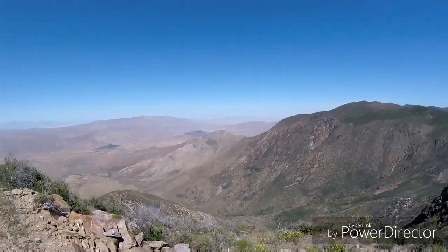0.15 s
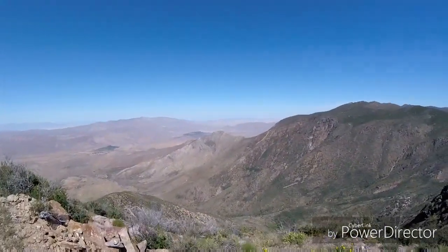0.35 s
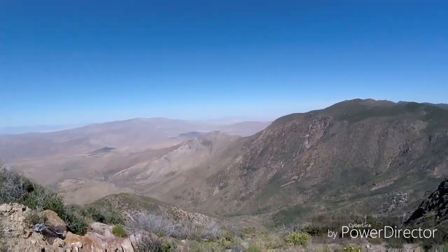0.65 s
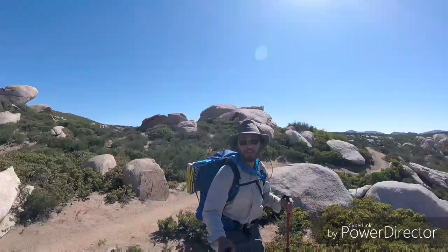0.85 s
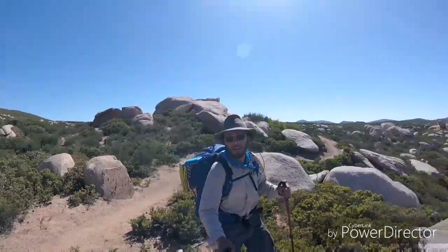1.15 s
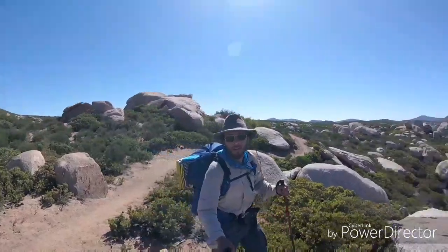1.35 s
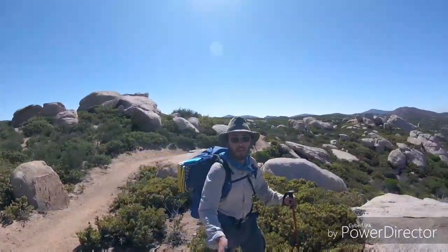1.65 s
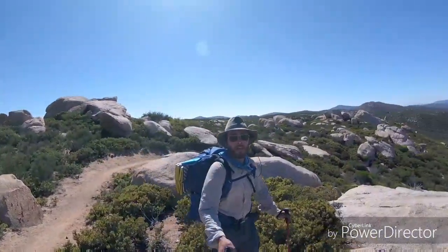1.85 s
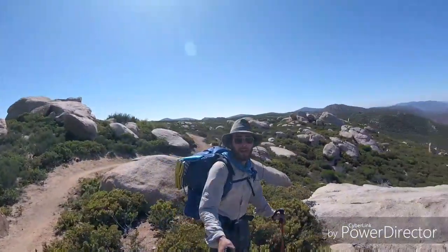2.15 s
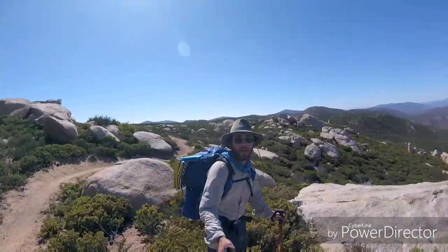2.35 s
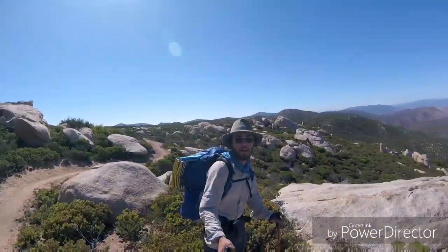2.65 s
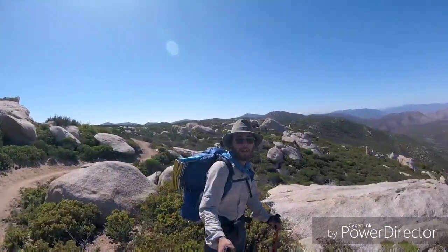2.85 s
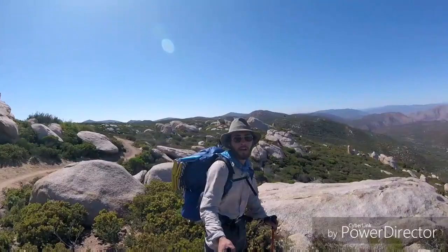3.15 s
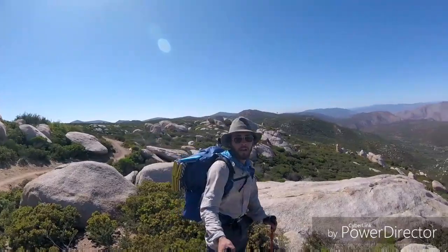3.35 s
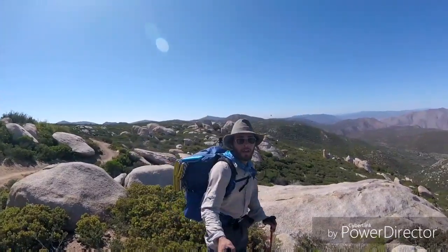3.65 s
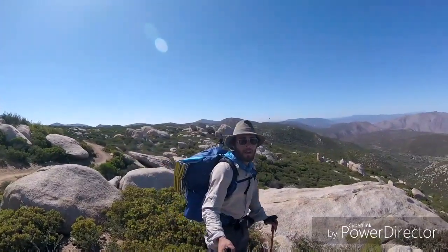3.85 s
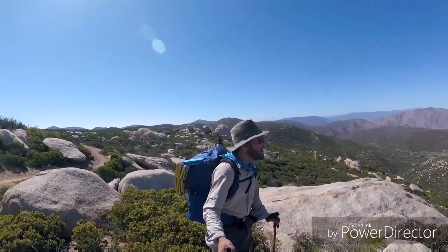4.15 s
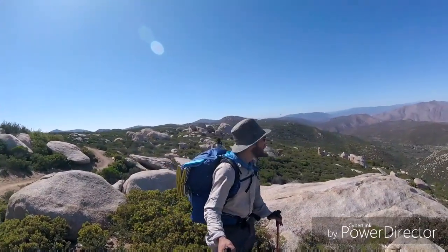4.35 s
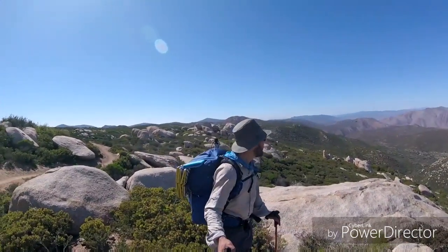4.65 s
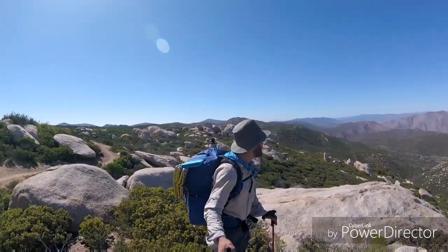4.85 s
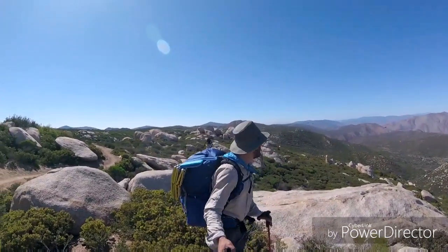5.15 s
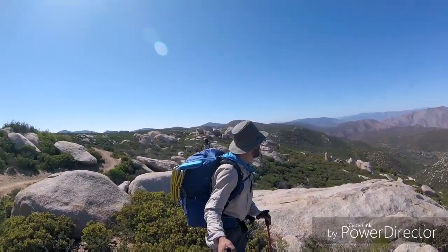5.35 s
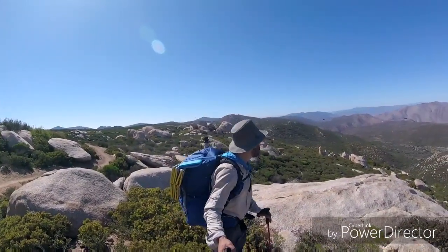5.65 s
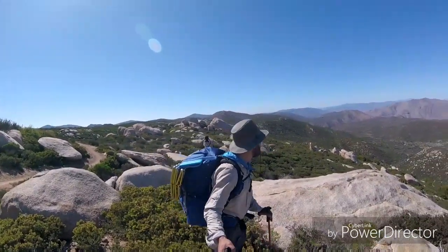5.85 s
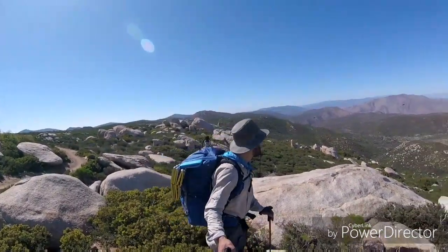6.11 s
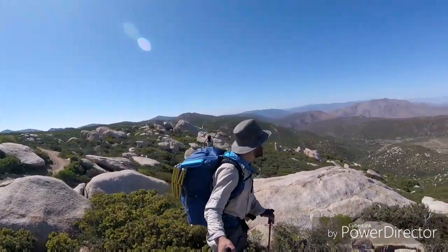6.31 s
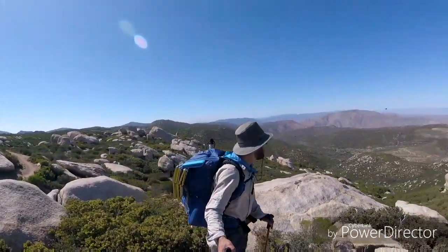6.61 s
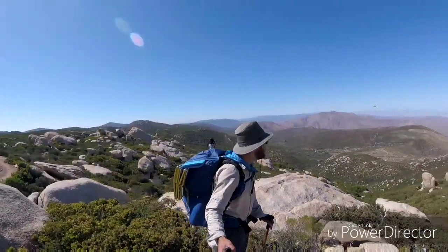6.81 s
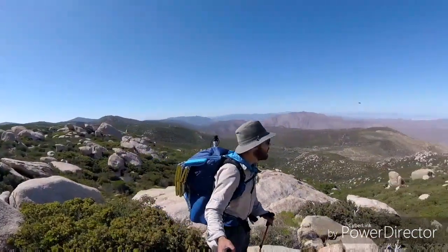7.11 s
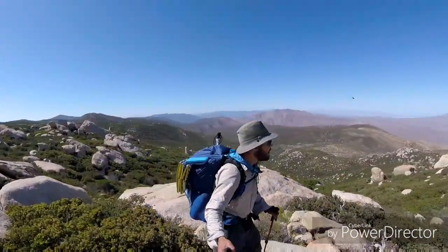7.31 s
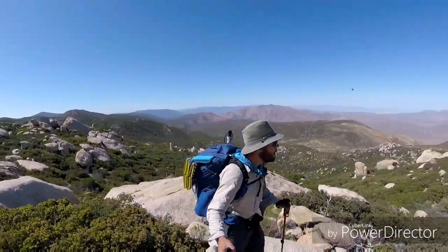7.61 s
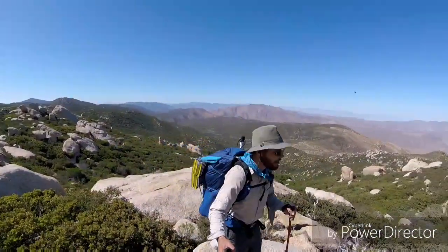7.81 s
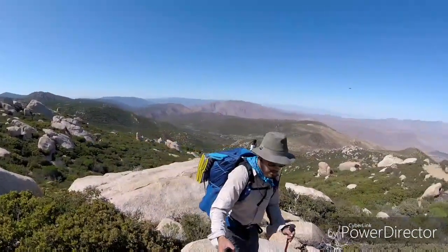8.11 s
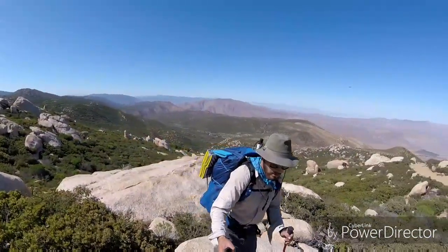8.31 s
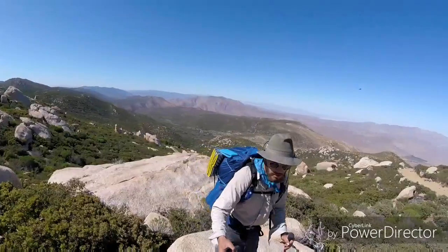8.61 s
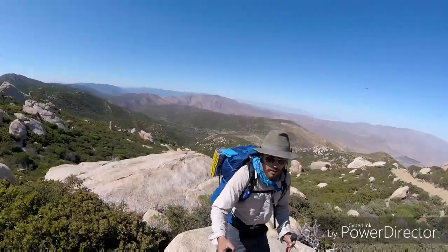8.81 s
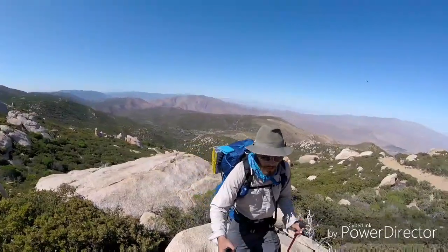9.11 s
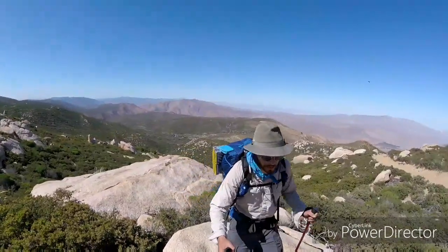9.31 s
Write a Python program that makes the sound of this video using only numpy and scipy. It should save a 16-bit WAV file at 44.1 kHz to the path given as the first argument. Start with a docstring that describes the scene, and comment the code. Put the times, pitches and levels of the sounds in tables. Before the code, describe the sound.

Heavy wind rumbling and tearing across an exposed microphone on a rocky ridge, with occasional dull boot scuffs and clicks of a pole tip.

```python
"""Rocky ridge, gusty wind: a hiker turns with a small camera at arm's length.
Eddies buffet the microphone port: half-octave noise and shared pops rumble, and rasp as gusts tear.
Slaps and a late soft scuff swell in the same bands; thumps are pressure lobes, ticks decaying steps.
A pole tip and boots tap and crunch on gritty rock: scratchy noise through rock resonances.
Faint coloured noise hisses behind, higher before 0.92 s, then lower on a set level curve."""
import sys
import numpy as np
from scipy import signal
from scipy.fft import rfft, irfft
from scipy.io import wavfile
from scipy.ndimage import uniform_filter1d

SR = 44100
rng = np.random.default_rng(int(sys.argv[2]) if len(sys.argv) > 2 else 0)


def magnitude_from_level(level_db):
    """Linear magnitude for a level in decibels (20 dB per decade)."""
    exponent = np.asarray(level_db, float) / 20
    return 10 ** exponent


def materialize(psi):
    """Save the field psi as 16-bit PCM at rate SR to the path in sys.argv[1].

    A 1-D psi becomes a single channel; in a 2-D psi each row is a channel.
    """
    bounded = np.clip(np.atleast_2d(psi).T, -1, 1)
    quanta = np.round(bounded * 32767).astype(np.int16)
    wavfile.write(sys.argv[1], SR, quanta)


N = 417627

# slow wind on the port; tearing = how close the small eddies come to the force:
# (time [s], force [dB], tearing [dB])
WIND = [(0.0, -7.5, -25), (0.3, -21, -24), (0.905, -24, -42), (0.945, -14.5, -18.5), (1.12, -24.5, -14.5),
        (1.28, -28.5, -17), (1.45, -34, -25.5), (1.77, -22.5, -34), (1.9, -23, -21.5), (2.32, -30, -23.5),
        (2.89, -42.5, -14.5), (2.93, -41.5, -2), (3.17, -32, 2.5), (3.33, -23, -2.5), (3.5, -18, -6),
        (3.74, -11, -10), (3.77, -22.5, 4), (4.06, -23, -11.5), (4.1, -21, -10.5), (4.27, -25, -21),
        (4.53, -13.5, -14), (4.85, -24, -7.5), (5.43, -19, -8.5), (5.54, -30.5, -26), (5.65, -16.5, -10),
        (5.69, -15.5, -5.5), (5.93, -25, -2.5), (6.2, -20.5, -15.5), (6.5, -20, -25), (6.88, -34, -30),
        (6.96, -30.5, -38), (8.17, -25, -42.5), (8.28, -17, -20), (8.5, -30, -51), (8.72, -39, -43.5),
        (8.9, -22, -29.5), (9.25, -30, -36.5), (9.47, -17, -18)]
# brief puffs (+) and lulls (-) laid on the slow wind:
# (peak time [s], length [s], force change [dB], tearing change [dB])
PUFFS = [(0.07, 0.085, -10, -21), (0.168, 0.09, -11, -11), (0.227, 0.0094, 3, 10), (0.733, 0.029, 12.5, -2),
         (1.08, 0.093, 8, -2.5), (1.705, 0.069, -0.5, 9.5), (1.883, 0.025, -9, 19), (1.997, 0.02, -10, -6),
         (2.091, 0.069, 8.5, 1), (2.2, 0.048, 10.5, 3.5), (2.963, 0.098, 5, 7.5), (3.031, 0.055, 6, 14.5),
         (3.138, 0.049, 3, -26), (3.233, 0.2, -1, 9), (3.375, 0.021, 3, 7), (3.434, 0.019, 9, 2.5),
         (3.465, 0.048, 3.5, -14.5), (3.595, 0.042, -5, 3), (3.622, 0.042, -2.5, 9.5),
         (3.801, 0.026, 5.5, -8.5), (3.857, 0.039, 0.5, -3), (4.029, 0.083, 0.5, 10.5),
         (4.189, 0.022, -12, 1.5), (4.276, 0.03, 9.5, 4), (4.567, 0.038, -2.5, 8),
         (4.648, 0.011, -6, -20.5), (4.785, 0.1, 7.5, -5.5), (4.434, 0.032, -8.5, 13.5),
         (4.929, 0.025, -1.5, 8), (4.993, 0.076, -7, -3.5), (5.083, 0.13, 9, -0.5), (5.185, 0.039, -7, -5),
         (5.219, 0.033, 8.5, -3), (5.291, 0.028, 1.5, 10), (5.729, 0.056, 3.5, 12),
         (5.785, 0.049, 3.5, -2.5), (5.909, 0.054, 3, 7.5), (6.025, 0.036, 5, 10.5),
         (5.855, 0.041, 3, 10.5), (5.866, 0.012, 1, -6), (6.099, 0.063, 4.5, 3), (6.138, 0.046, -4.5, 11),
         (6.423, 0.093, 2, 17), (6.595, 0.055, 7, 5.5), (6.765, 0.1, 8.5, -3), (6.879, 0.13, 10, 11),
         (7.258, 0.033, 10, 4), (7.724, 0.047, 9.5, 11), (7.436, 0.16, 7, -0.5), (7.816, 0.15, -7, -11),
         (8.022, 0.26, 5.5, -1.5), (8.305, 0.033, 2.5, 7.5), (8.439, 0.11, 6.5, 18), (8.572, 0.023, 9, 14),
         (8.632, 0.06, 6.5, 23.5), (8.811, 0.027, 14.5, 16), (8.949, 0.052, 4, -8.5),
         (9.029, 0.0082, 18, 16.5), (9.078, 0.09, -5.5, 1), (9.137, 0.028, -4, 16),
         (9.273, 0.031, 11.5, 11.5), (9.37, 0.12, 2.5, 7.5)]
# how squarely the port faces the wind as the arm turns: (time [s], lift of the smallest eddies [dB])
BITE = [(0, 32), (.9, 2), (.95, 18), (1.05, 14), (1.35, 11), (1.8, 11), (3.1, -17), (3.5, 3), (4.1, 6),
        (4.25, 4.5), (5.5, -12.5), (5.8, -4.5), (5.95, 2), (6.08, -3.5), (6.4, -15), (9.47, -10.5)]
# eddy sizes: (centre [Hz])
EDDY_HZ = [40, 100, 200, 630, 1100, 1900]
# a half octave's share of the force, per eddy size: (level [dB])
EDDY_SHARE_DB = [-8, -8.5, -7, -8, -19.5, -31]
# burstiness per eddy size: (scale of the level swings [dB])
EDDY_BURST_DB = [1.299, 2.1, 3.0, 3.501, 3.6, 4.5]
# gain with tearing, per eddy size: (slope [dB per dB])
EDDY_TEAR_DB_PER_DB = [-0.034, -0.022, 0.18, 0.96, 1.26, 1.61]
# short low bursts: wind slaps on the port, and a soft scuff from 9.24 to 9.39 s:
# (time [s], peak [dB], treble over peak [dB])
SLAPS_AND_SCUFF = [(.035, -23, -62), (0.074, -18.5, -70), (.196, -23, -46), (.241, -26, -56),
                   (0.296, -23, -53), (0.362, -24, -43), (0.677, -23.5, -68), (.935, -24, -28),
                   (1.04, -24, -14), (1.055, -27, -21), (1.09, -26, -46), (1.849, -14, -30),
                   (1.861, -9.5, -28), (1.87, -10.5, -33), (1.904, -9.5, -66), (1.935, -14.5, -55),
                   (1.968, -18, -58), (2.036, -16, -44), (2.066, -19, -21), (2.076, -13.5, -34),
                   (2.187, -27, -35), (2.96, -25, -47), (2.99, -25, -45), (3.012, -13.5, -37),
                   (3.021, -10, -39), (3.043, -17.5, -32), (3.165, -25, -48), (3.186, -9.5, -46),
                   (3.198, -8, -34), (3.251, -24, -23), (3.274, -16, -29), (3.289, -26, -29),
                   (3.346, -6.5, -42), (3.366, -17, -39), (3.378, -6, -27), (3.417, -6, -42),
                   (3.44, -11, -36), (3.474, -15.5, -30.5), (3.513, -9.5, -35.5), (3.543, -15, -30),
                   (3.592, -10, -27.5), (3.614, -12.5, -24), (3.635, -19, -30), (3.645, -20, -24),
                   (3.675, -12, -32), (3.689, -12.5, -27), (3.737, -9, -26), (3.759, -15, -16),
                   (3.771, -8.5, -17.5), (3.8, -18.5, -12.5), (3.808, -15, -18), (3.824, -16.5, -21),
                   (3.898, -13.5, -37), (3.919, -21.5, -20), (3.937, -21, -19.5), (3.95, -20, -19),
                   (3.974, -26, -14), (3.99, -27, -12), (4.003, -24.5, -10.5), (4.03, -17, -18.5),
                   (4.042, -25, -19), (4.057, -18.5, -21), (4.096, -28, -33), (4.132, -17, -30),
                   (4.225, -17, -71), (4.447, -20.5, -27), (4.51, -15, -47), (4.566, -11.5, -42),
                   (4.701, -12, -46), (4.752, -11, -30), (4.783, -3, -40), (4.802, -15.5, -26),
                   (5.018, -19, -32), (5.042, -15, -33), (5.067, -26, -31), (5.208, -17, -28),
                   (5.12, -14.5, -29), (5.084, -21, -23), (5.147, -22, -25), (5.285, -9.5, -45),
                   (5.369, -16, -46), (5.402, -22.5, -26.5), (5.676, -8.5, -50), (5.705, -11, -27),
                   (5.723, -10, -20), (5.736, -16, -19), (5.808, -8.5, -25.5), (5.835, -5, -24),
                   (5.854, -13, -17), (5.903, -7, -24.5), (5.916, -0.5, -29.5), (5.893, -15, -26),
                   (5.95, -12, -42), (5.968, -8, -37), (6.011, -17, -34), (6.034, -17.5, -26.5),
                   (6.097, -17, -51), (6.16, -10.5, -62), (6.211, -13, -53), (6.238, -9.5, -62),
                   (6.271, -23.5, -32), (6.316, -22, -55), (6.351, -31, -51), (6.396, -26.5, -45),
                   (6.411, -26, -48), (6.433, -16, -53), (8.31, -9.5, -65), (8.801, -33, -59),
                   (8.838, -30, -64), (9.026, -19.5, -65), (9.158, -18.5, -60), (9.243, -36.5, -50),
                   (9.267, -42, -50), (9.282, -30, -45), (9.32, -36, -50), (9.342, -26, -61),
                   (9.386, -24, -56), (9.447, -12.5, -61)]
# single eddies that push (+) or suck (-) the diaphragm once:
# (time [s], lobe pressure [full scale], half-height width of the lobe [s])
THUMPS = [(0.24, -0.34, 0.0071), (0.301, 0.93, 0.0025), (0.361, 0.96, 0.0022), (0.4889, -0.75, 0.0048),
          (0.6126, -0.39, 0.0066), (0.726, -0.62, 0.0033), (0.9502, -1.3, 0.0016), (2.0805, 0.47, 0.0015),
          (3.5769, -0.53, 0.0016), (4.304, 0.49, 0.0015), (4.588, -0.67, 0.00091), (4.927, -0.51, 0.0059),
          (5.088, -0.19, 0.0017), (5.149, -0.85, 0.0011), (5.403, -0.6, 0.00081), (5.6766, -1.26, 0.00092),
          (6.0998, -0.07, 0.00077), (6.2734, -0.73, 0.0013), (6.8847, 0.48, 0.0038), (8.3129, 0.74, 0.0022),
          (8.813, -0.3, 0.0081), (9.1637, 0.46, 0.005), (9.413, 0.82, 0.0028)]
# sharp ticks: (time [s], treble peak [dB], low-pass corner [Hz])
TICKS = [(0.921, -29.5, 11700), (.946, -48, 7000), (1.069, -42, 8000), (1.131, -45, 8060),
         (2.0915, -51, 8000), (3.5329, -32, 8060), (4.526, -36, 7460), (4.556, -44.5, 7000),
         (4.717, -32.5, 7750), (5.3567, -39, 7560), (5.676, -33, 8200), (5.7335, -39.5, 8030),
         (8.269, -24.5, 7960)]
# pole tip and boot on rock:
# (time [s], push [dB], contact [s], grit over push [dB], brightness [dB per octave])
TAPS = [(.222, -26, 0.00088, -13.5, 5), (0.237, -58, 0.037, -18, 6), (0.353, -48.5, 0.016, -8, -3.5),
        (0.383, -53.5, 0.061, -13, -2.5), (0.435, -49, 0.043, -8, 0), (2.018, -32.5, 0.0035, -2, -1),
        (2.145, -37, 0.00084, -28, 0.5), (2.48, -47, 0.0013, -20, -2), (4.7544, -33, 0.0011, -21, -11),
        (4.784, -30.5, 0.00097, -26, -14), (4.802, -34, 0.00079, -23, -17),
        (5.211, -35.5, 0.0011, -14.5, -22), (7.28, -51, 0.0096, 15, 2), (7.292, -49, 0.0093, -11, -1),
        (7.436, -50, 0.0017, -20, 0), (7.607, -38, 0.0059, -8, 2.5), (8.151, -47, 0.002, -16, -3),
        (8.174, -48, 0.0024, -34, -3), (8.205, -47, 0.0016, -7, -2), (8.236, -21.5, 0.0057, -7, -4.5),
        (8.348, -59, 0.018, 2, -1), (8.9606, -26.5, 0.002, -24, -1), (8.9667, -46, 0.001, -18, 8)]
# resonances of tip and rock: (centre [Hz], width [Hz], gain [dB])
ROCK = [(1166, 300, 1), (1660, 350, 5.5), (2440, 440, 2.5), (3340, 720, -3.5), (4210, 280, -0.5),
        (4920, 900, -2.5), (7160, 1800, -34)]
# background hiss in the 6-9 kHz band, stepping down near 0.92 s: (time [s], level [dB])
HISS = [(0, -70.5), (.5, -72), (.915, -70.5), (.93, -78.5), (1.4, -80.5), (1.9, -75.5), (2.6, -74),
        (3.3, -73.5), (3.6, -76.5), (4.3, -77), (5.5, -78), (6.2, -77), (7, -75.5), (8.1, -72.5),
        (8.4, -77), (9.47, -73.5)]
# hiss spectrum: (frequency [Hz], relative density [dB])
HISS_COLOUR = [(300, 10.5), (800, 20), (1600, 17.5), (3000, 12.5), (4200, 4), (5500, 8.5), (7000, 10),
               (9000, 5), (12000, -5), (15000, -35.5)]

PUFF_RISE_SHARE = 0.61  # of a puff's length
RASP_FALL_DB_PER_OCT = -16  # above the smallest eddies
BAND_FLICKER_DB = 1.3  # each half octave's own wavering
POPS_PER_S, POP_SCATTER_DB = 400, 3.2
POP_SHARE, POP_FULL_HZ = 0.75, 400  # pops' share of the power, at its most from this band up
POP_FADE_DB = 24  # pops die out as tearing falls this far below 0 dB
BURST_HZ, BURST_TREBLE_HZ, BURST_UNIT_S = 870, 3000, 0.004
BURST_CREST_UNITS = 0.75  # crest delay in BURST_UNIT_S
BURST_SHARE_DB = -17  # a half octave's share of a burst's peak, at BURST_HZ
BURST_POP_DB = 7  # a burst's own pop over the smallest chance pop
BURST_BASS_DB_PER_OCT, BURST_DULL_BASS = 2.5, 0.12  # slope below BURST_HZ; its loss per dB of dullness
STRAYS, STRAY_SCATTER_DB = 70, 2
STRAY_TREBLE_DB, STRAY_TREBLE_SPREAD_DB = -31, 8  # at 0 dB tearing; spread is +/-
STRAY_TEAR_DB_PER_DB = 0.52  # treble gained with tearing
THUMP_REBOUND = 2.8  # width of the opposite swing over that of the lobe
TICK_STEP_DB = 8.5  # step height over treble peak
GRIT_T60_S = 0.08
ROCK_SCATTER = 0.04  # +/- share of each ring pitch, drawn per contact


def curve(table):
    """Columns of a table joined by straight lines, one value a sample."""
    s, *columns = np.transpose(table)
    return np.array([np.interp(np.arange(N) / SR, s, c) for c in columns])


def lowpass(x, hz, order):
    """Butterworth low-pass."""
    return signal.sosfilt(signal.butter(order, hz, fs=SR, output="sos"), x)


def band(x, hz, width_hz, order=3):
    """Band-pass of a given width, centred geometrically near hz."""
    middle = np.sqrt(hz ** 2 + width_hz ** 2 / 4)
    edges = [middle - width_hz / 2, middle + width_hz / 2]
    return signal.sosfilt(signal.butter(order, edges, "bandpass", fs=SR, output="sos"), x)


def walk(rate_hz):
    """Random levels held 1 / rate_hz and slewed twice; spread near 1."""
    k = int(SR / rate_hz)
    held = np.repeat(rng.standard_normal(N // k + 1), k)
    return 1.3 * uniform_filter1d(uniform_filter1d(held, k), k)[:N]


def spikes(s, size):
    """Impulses of the given sizes at the given times."""
    return np.bincount(np.round(s * SR).astype(int), size, N)[:N]


def flow():
    """Force and tearing of the wind: the slow curve with every puff and lull laid on it."""
    t, out = np.arange(N) / SR, curve(WIND)
    for s, length_s, force_db, tear_db in PUFFS:
        near = slice(max(int((s - 0.4) * SR), 0), int((s + 0.4) * SR))
        share = np.where(t[near] < s, PUFF_RISE_SHARE, 1 - PUFF_RISE_SHARE)
        side_s = share * max(length_s, 0.01)
        out[:, near] += np.outer([force_db, tear_db], np.exp(-((t[near] - s) / side_s) ** 2))
    return out


def strays(force_db, tear_db):
    """Further slaps at random times, scaled to the small eddies, brighter as the flow tears."""
    chance = rng.random((STRAYS, 3))
    at = (chance[:, 0] * (N - 1)).astype(int)
    peak_db = force_db[at] + tear_db[at] - STRAY_SCATTER_DB * np.log(1 - chance[:, 1])
    treble_db = STRAY_TREBLE_DB + STRAY_TEAR_DB_PER_DB * tear_db[at]
    treble_db = treble_db + STRAY_TREBLE_SPREAD_DB * (2 * chance[:, 2] - 1)
    return np.c_[at / SR, peak_db, treble_db]


def eddy_pops(burst_s):
    """Tiny eddies burst as sharp pops at random; every listed or stray burst adds one at its crest."""
    size = magnitude_from_level(POP_SCATTER_DB * rng.exponential(size=N))
    pops = (rng.random(N) < POPS_PER_S / SR) * size * rng.choice([-1, -1, 1], N)
    crest_s = burst_s + BURST_CREST_UNITS * BURST_UNIT_S
    return pops - spikes(crest_s, np.full(len(burst_s), magnitude_from_level(BURST_POP_DB)))


def eddies(hz, pops, tear_db):
    """A half octave of fresh noise plus pops, each scaled to rms 1 before mixing by power share."""
    smooth = band(rng.standard_normal(N), hz, hz / 3)
    # forward and backward: pops stay in step across bands, hence sharp
    sharp = band(pops, hz, hz / 2.5, order=2)
    sharp = band(sharp[::-1], hz, hz / 2.5, order=2)[::-1]
    share = POP_SHARE * np.clip(1 + tear_db / POP_FADE_DB, 0, 1) * min(hz / POP_FULL_HZ, 1)
    return np.sqrt(1 - share) * smooth / smooth.std() + np.sqrt(share) * sharp / sharp.std()


def burst_levels(hz, s, peak_db, treble_db):
    """Slap and scuff envelopes in one half octave: one treble slope; dull ones lean on the rumble."""
    octaves = np.log2(hz / BURST_HZ)
    if octaves > 0:
        slope_db = treble_db / np.log2(BURST_TREBLE_HZ / BURST_HZ)
    else:
        slope_db = BURST_BASS_DB_PER_OCT + BURST_DULL_BASS * np.minimum(treble_db + 30.5, 0)
    t = np.arange(int(8 * BURST_UNIT_S * SR)) / SR / BURST_UNIT_S
    shape = np.exp(-((t - BURST_CREST_UNITS) / 0.53) ** 2)
    shape = shape + 0.043 * np.exp(-((t - 1.5) / 0.26) ** 2)  # weak after-bump
    return signal.oaconvolve(spikes(s, magnitude_from_level(peak_db + BURST_SHARE_DB + slope_db * octaves)), shape)[:N]


def wind_and_scuff():
    """Each eddy size fills its half octaves, burstier when smaller; slaps and scuff swell the bands."""
    force_db, tear_db = flow()
    size_db = force_db + np.outer(EDDY_TEAR_DB_PER_DB, tear_db)
    size_db[-2:] += np.outer([0.3, 1], curve(BITE)[0])
    swings = 0.22 * walk(50) + 0.65 * walk(160) + 0.75 * walk(400)
    s, peak_db, treble_db = np.vstack([SLAPS_AND_SCUFF, strays(force_db, tear_db)]).T
    pops = eddy_pops(s)
    sizes, out = range(len(EDDY_HZ)), np.zeros(N)
    for hz in 22 * 2 ** np.arange(0, 8.6, 0.5):
        # fractional position among the eddy sizes
        place = np.interp(np.log(hz), np.log(EDDY_HZ), sizes)
        low = min(int(place), len(sizes) - 2)
        db = size_db[low] + (place - low) * (size_db[low + 1] - size_db[low])
        db = db + np.interp(place, sizes, EDDY_SHARE_DB)
        db = db + RASP_FALL_DB_PER_OCT * max(np.log2(hz / EDDY_HZ[-1]), 0)
        db = db + np.interp(place, sizes, EDDY_BURST_DB) * swings
        db = db + BAND_FLICKER_DB * walk(min(hz / 4, 30))
        bursts = burst_levels(hz, s, peak_db, treble_db)
        out += eddies(hz, pops, tear_db) * np.hypot(magnitude_from_level(db), bursts)
    return lowpass(out, 5500, 4)  # the narrow port passes little above its corner


def hiss():
    """Steady background hiss: coloured noise on a set level curve, higher before 0.92 s."""
    hz, db = np.transpose(HISS_COLOUR)
    f = np.fft.rfftfreq(N + 1, 1 / SR) + 1
    colour = magnitude_from_level(np.interp(np.log(f), np.log(hz), db, left=-40, right=-60))
    x = irfft(rfft(rng.standard_normal(N + 1)) * colour, N + 1)[:N]
    x = x / band(x, 7500, 3000).std()  # rms 1 in the 6-9 kHz band
    return magnitude_from_level(curve(HISS)[0]) * x


def taps():
    """A short scratchy contact, then grit that settles, both ringing tip and rock."""
    out = np.zeros(N)
    t = np.arange(int(0.2 * SR)) / SR
    for s, push_db, contact_s, grit_db, bright_db in TAPS:
        noise = rng.standard_normal(len(t))
        rough_db = 2.0 * rng.standard_normal(len(t) // 40 + 1).repeat(40)[:len(t)]
        spot = 1 + ROCK_SCATTER * rng.uniform(-1, 1, len(ROCK))
        u = t / max(contact_s, 1e-4)
        contact = np.sqrt(u) * np.exp(1 - u ** 2)
        grit = magnitude_from_level(grit_db - 60 * t / GRIT_T60_S) * np.minimum(u * 2, 1)
        scratch = (contact + grit) * noise * magnitude_from_level(rough_db)
        ring = np.zeros(len(t))
        for (hz, width_hz, gain_db), k in zip(ROCK, spot):
            mode_db = gain_db + bright_db * np.log2(hz / ROCK[2][0])
            ring += magnitude_from_level(mode_db) * band(scratch, hz * k, width_hz, order=2)
        out[int(s * SR):][:len(t)] += magnitude_from_level(push_db) * ring
    return out


def thumps():
    """One lobe of pressure inside a wide, weak swing the other way."""
    out, t = np.zeros(N), np.arange(-1500, 1500) / SR
    for s, pressure, width_s in THUMPS:
        u = (2 * t / max(width_s, 5e-4)) ** 2 * np.log(2)
        rebound = np.exp(-u / THUMP_REBOUND ** 2) / THUMP_REBOUND
        out[int(s * SR) - 1500:][:len(t)] += pressure * (np.exp(-u) - rebound)
    return out


def ticks():
    """Sharp ticks: a downward step in the signal that decays exponentially, low-passed."""
    out, t = np.zeros(N), np.arange(int(0.03 * SR)) / SR
    for s, peak_db, top_hz in TICKS:
        step = magnitude_from_level(peak_db + TICK_STEP_DB) * np.exp(-t / 0.0026)
        out[int(s * SR):][:len(t)] -= lowpass(step, top_hz, 2)
    return out


def scene():
    """Wind on the port, taps and ticks, hiss behind; one channel."""
    return (wind_and_scuff() + thumps() + ticks() + taps() + hiss())[None]


def top_cut(x):
    """Nothing passes above the cut-off."""
    return signal.sosfilt(signal.butter(12, 15050, fs=SR, output="sos"), x)


def record(dry):
    """The camera drops the deepest bass and rounds the loudest peaks."""
    x = signal.sosfilt(signal.butter(2, 20, "highpass", fs=SR, output="sos"), dry)
    x = np.tanh(1.05 * x) / 1.05
    x = x * np.minimum(np.arange(N)[::-1] / (0.002 * SR), 1)  # 2 ms fade-out: no click
    return top_cut(x)


dry = scene()
out = record(dry)
materialize(out)
```